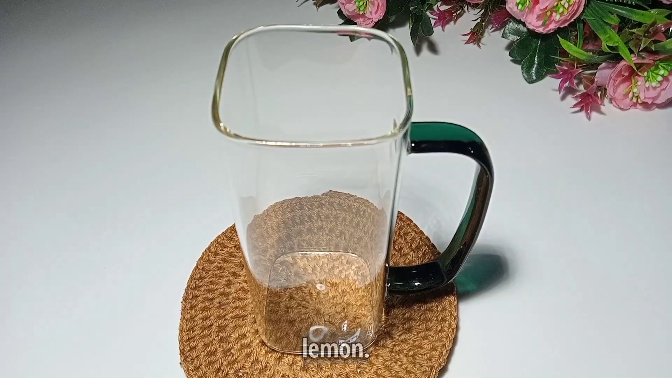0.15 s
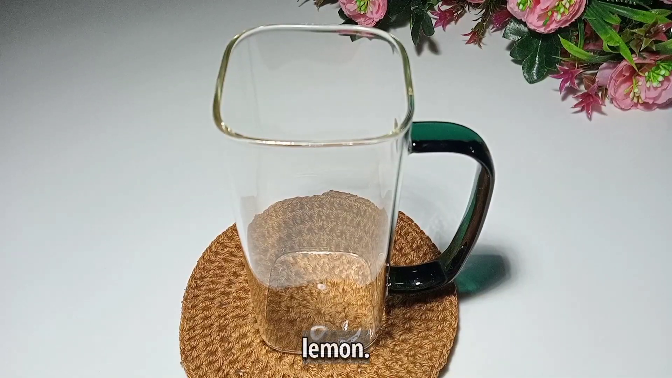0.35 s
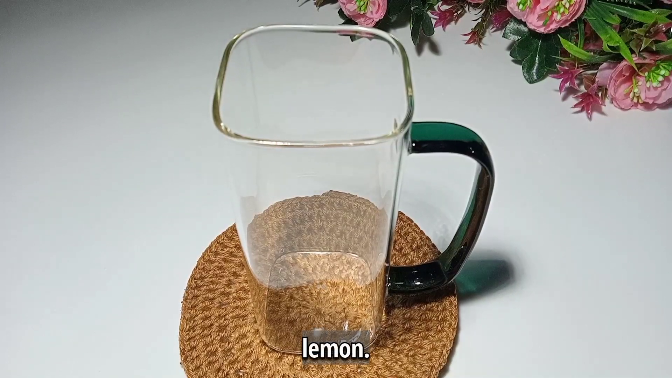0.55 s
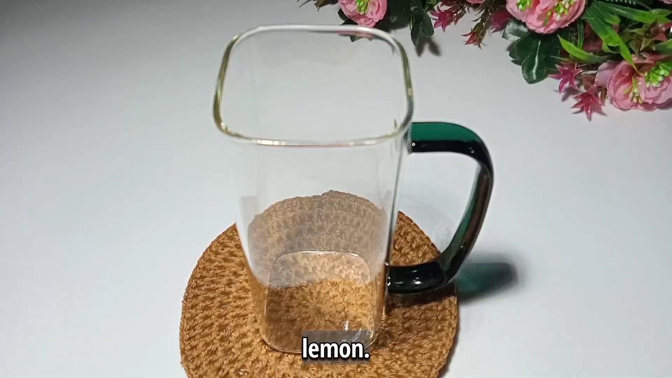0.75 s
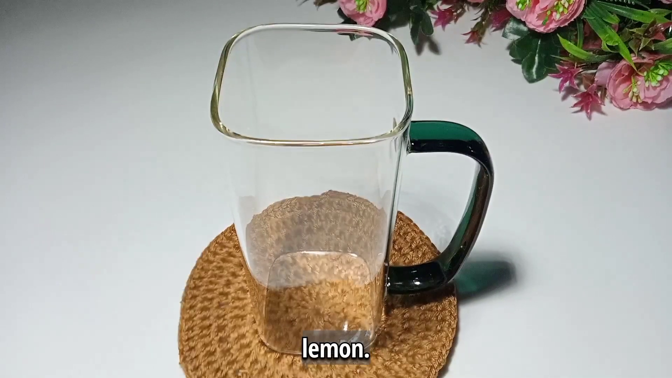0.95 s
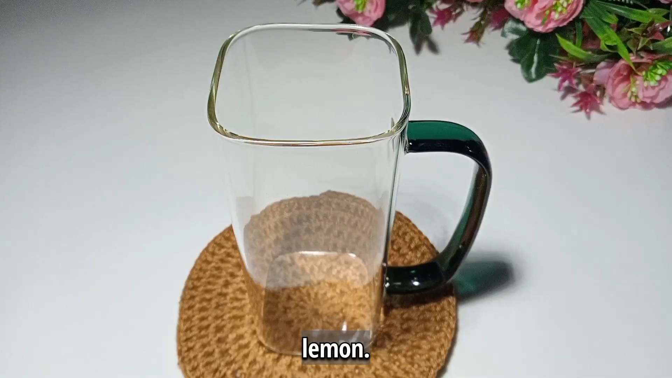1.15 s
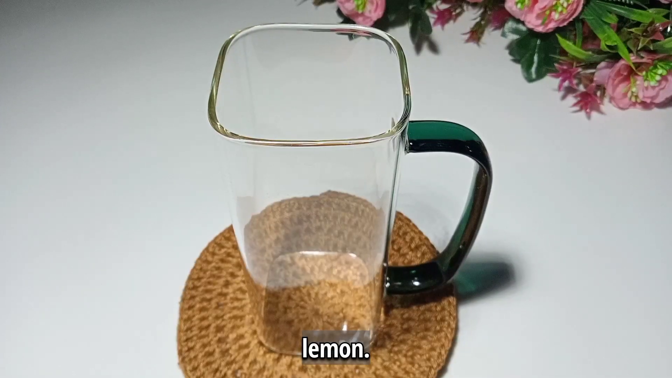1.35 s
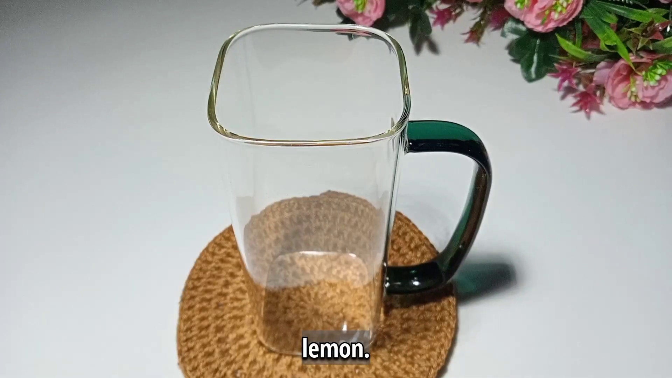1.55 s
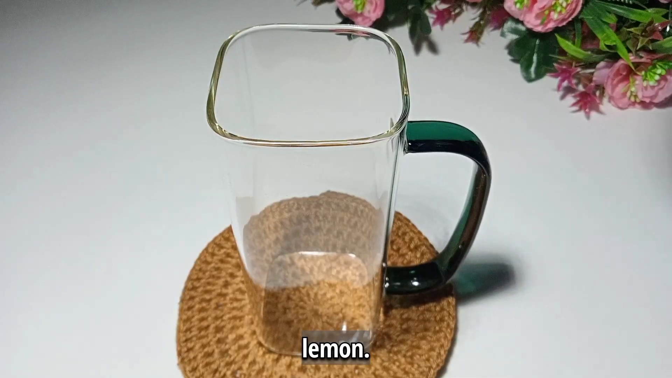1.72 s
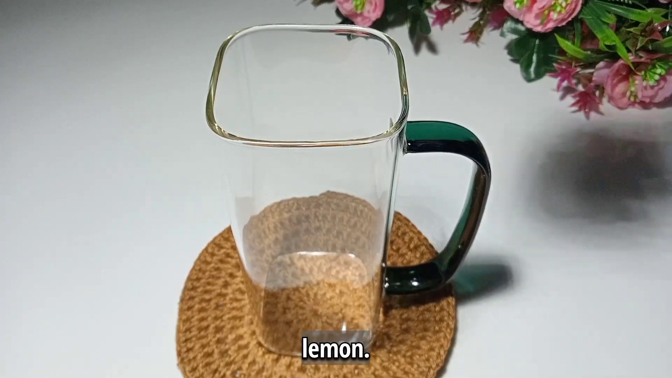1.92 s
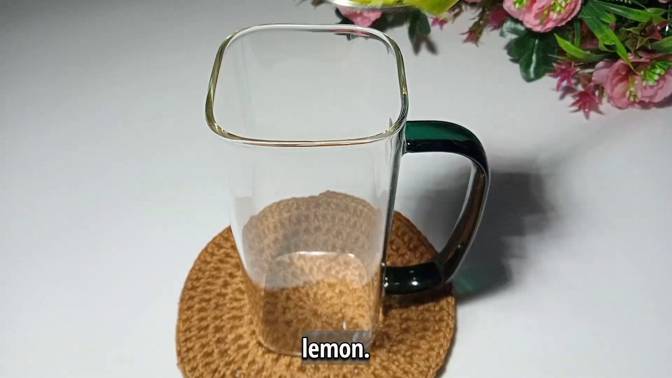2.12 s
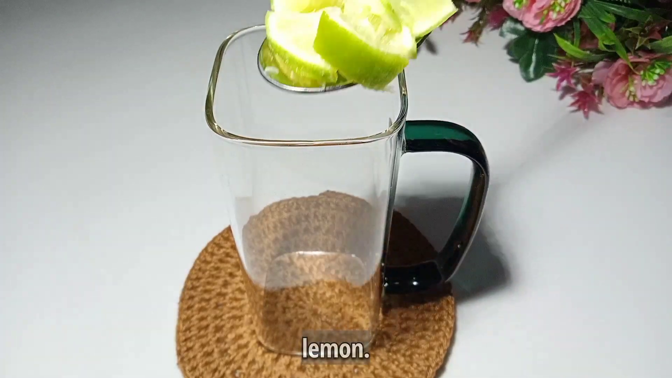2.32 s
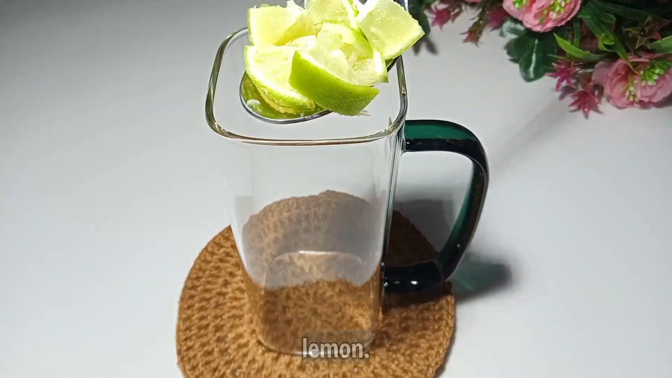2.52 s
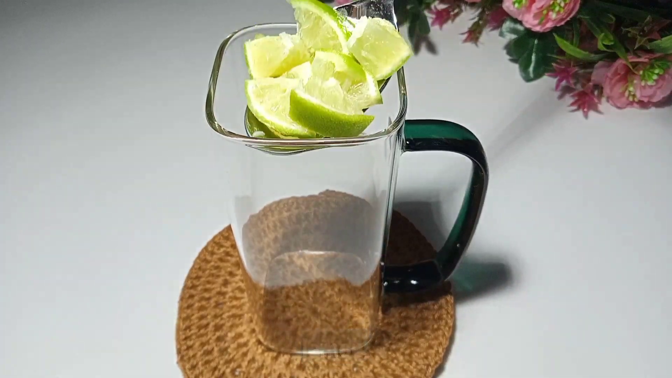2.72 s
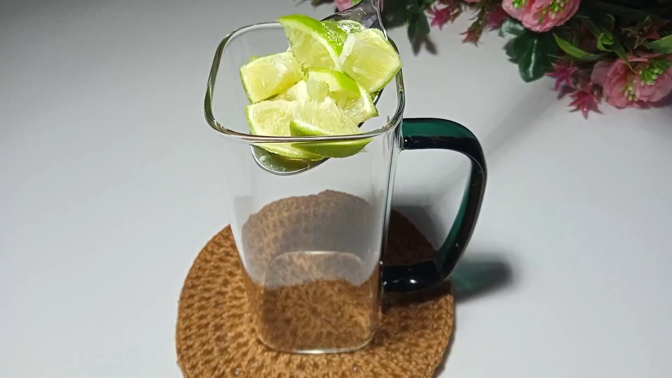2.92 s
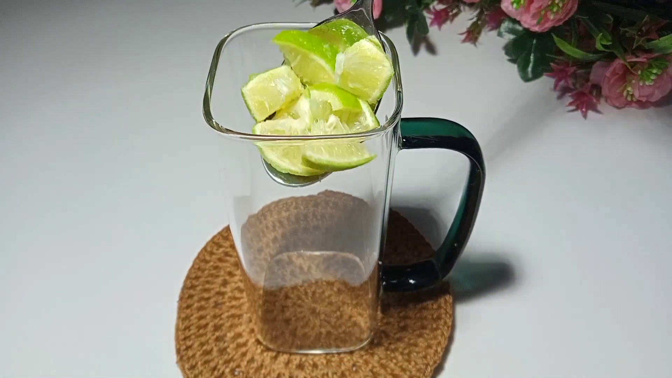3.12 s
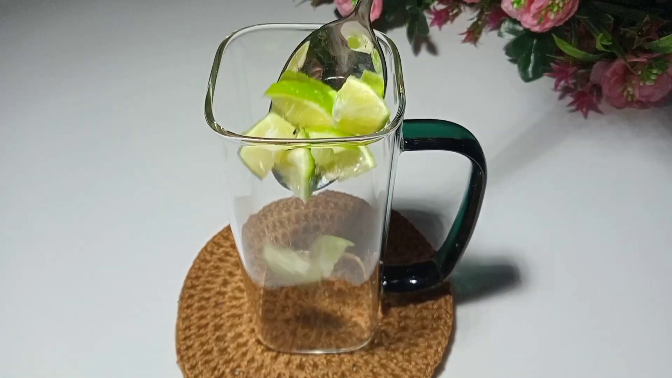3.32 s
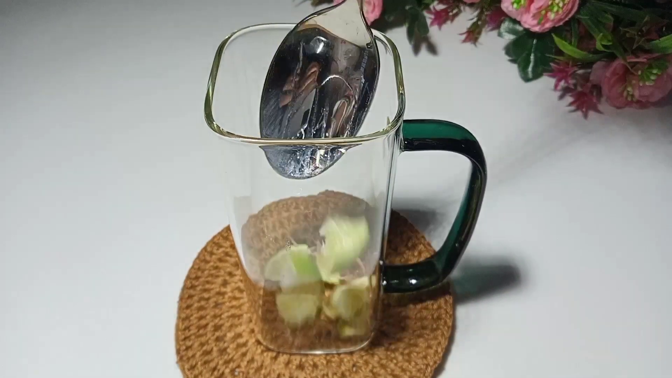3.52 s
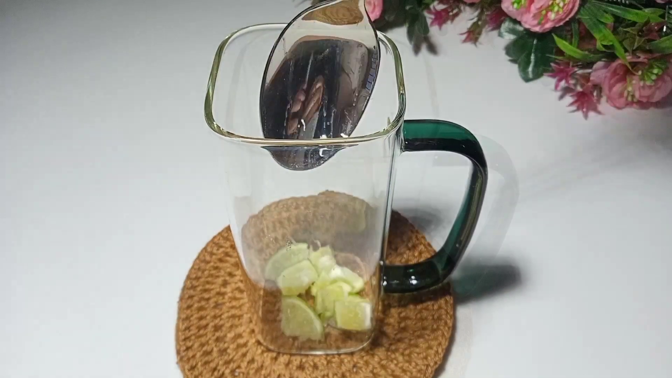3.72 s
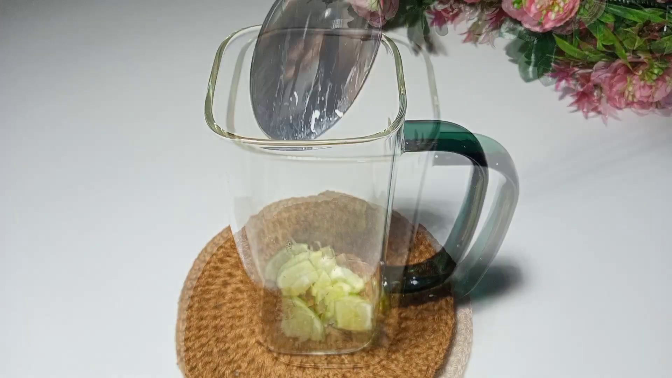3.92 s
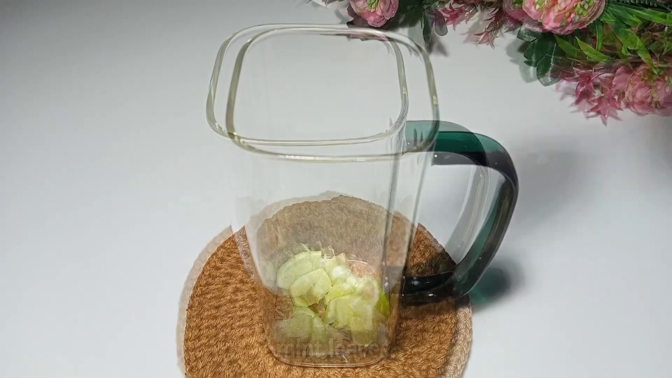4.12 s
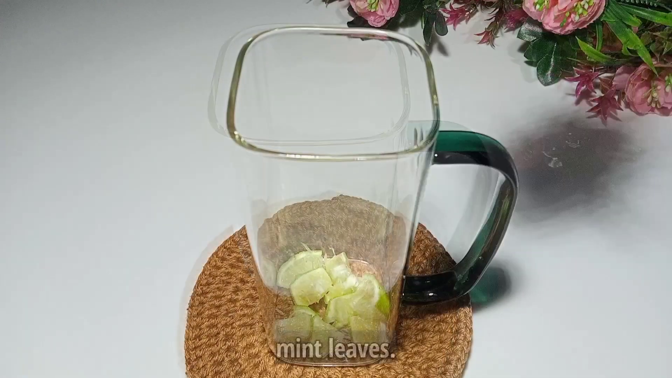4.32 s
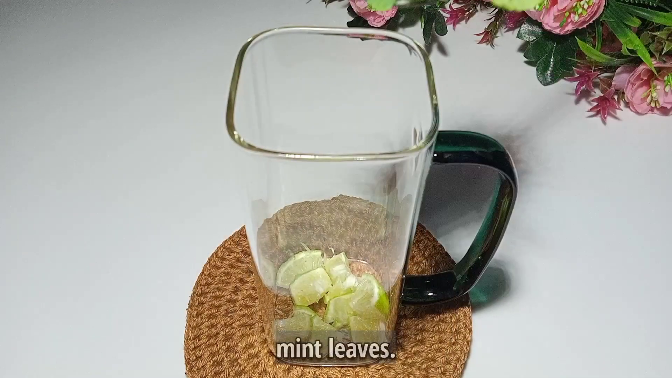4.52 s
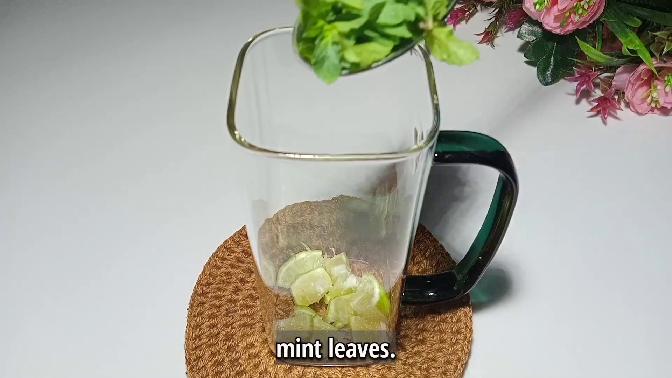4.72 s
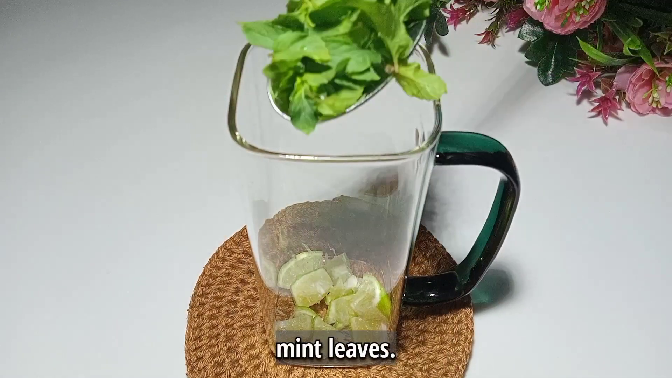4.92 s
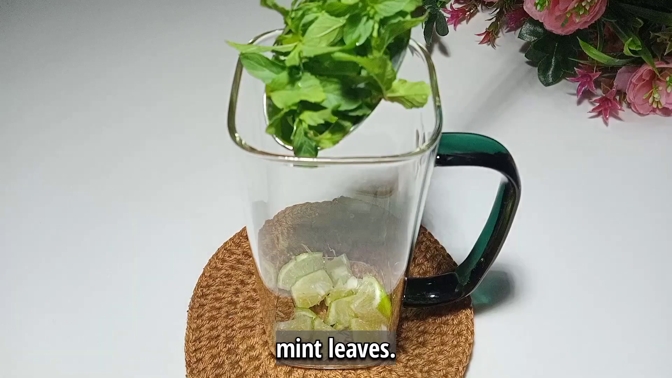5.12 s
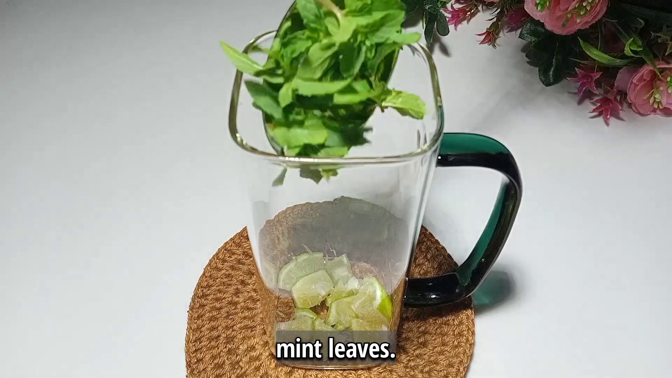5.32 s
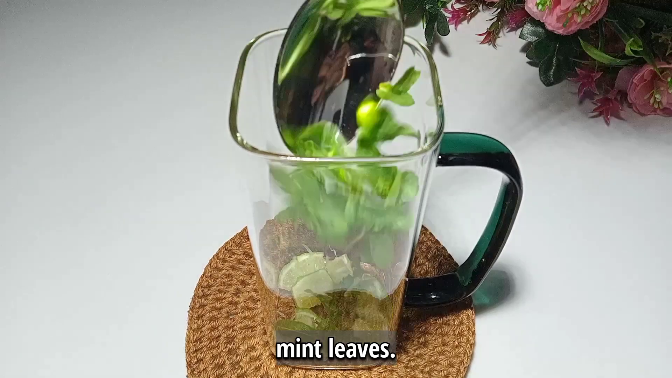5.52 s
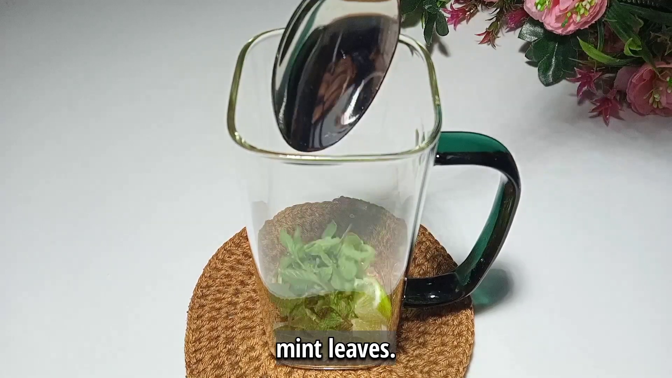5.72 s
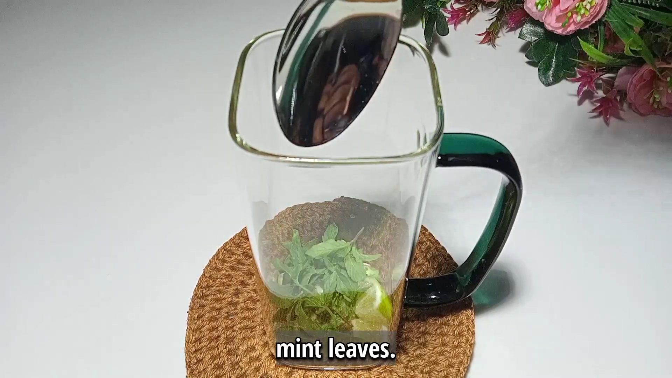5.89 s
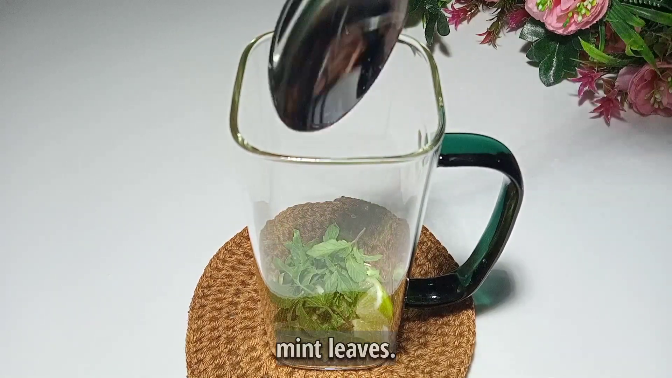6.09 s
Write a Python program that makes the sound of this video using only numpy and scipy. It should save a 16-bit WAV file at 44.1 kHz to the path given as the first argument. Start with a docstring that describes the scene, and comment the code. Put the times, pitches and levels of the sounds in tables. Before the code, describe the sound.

Quiet kitchen: faint rustles, sharp ringing spoon-on-glass clinks, hollow plops of lime pieces, a pause, then a cluster of duller glass taps.

```python
"""A quiet kitchen: lime pieces, then mint leaves, are tipped from a steel spoon into a square glass mug.
Spoon or lime on glass gives modal rings with noisy cracks; the spoon, resting on the rim, damps them.
Falling lime excites the air column and the table; the mint has no landing sound of its own.
Rustles and a light tap are shaped noise, a faint whirr is a fluttering falling tone, and filtered
noise gives hiss and rumble. Decaying noise echoes the mug, spoon and lime sounds."""
import sys
import numpy as np
from scipy import signal
from scipy.fft import rfft, irfft
from scipy.io import wavfile
from scipy.ndimage import uniform_filter1d

SR = 44100
rng = np.random.default_rng(int(sys.argv[2]) if len(sys.argv) > 2 else 0)


def transcribe(u):
    """Save the signal u as a 16-bit wav file named by the first command-line argument.

    u: samples, shape (n,) or (channels, n), limited to [-1, 1]; the rate is SR.
    q: integer samples, one column per channel.
    """
    v = np.clip(np.atleast_2d(u).T, -1, 1)
    q = np.round(v * 32767).astype(np.int16)
    wavfile.write(sys.argv[1], SR, q)


N = 271215
TIME = np.arange(N) / SR

# Noise spectra of the room's hiss and rumble: frequency_hz, relative_level_db (per Hz)
HISS_SPECTRUM = [(170, 4), (240, 3.5), (400, -2), (830, -6.5), (1450, -9), (2900, -12), (3850, -18),
                 (6280, -35), (8030, -33), (10100, -40), (15500, -38.5)]
RUMBLE_SPECTRUM = [(44, -17.5), (50, -8), (65, -2.5), (84, 3.5), (102, -6.5), (120, 3), (150, -10.5),
                   (260, -12), (400, -17.5)]
# Slow heaving of the rumble: time_s, level_db
RUMBLE_LEVEL = [(0.0, -68), (0.29, -66), (0.79, -69), (2.53, -66), (2.72, -63), (3.2, -64), (3.56, -57),
                (4.11, -70), (5.45, -71), (5.81, -65), (6.15, -67)]
HISS_DB = -67  # mean level

# Strokes of handling and sliding food: start_s, level_db, brightness_db_per_octave
RUSTLES = [(.06, -71, 1), (1.056, -59.5, -4), (1.135, -58, -3.5), (1.52, -68.5, -1.5), (1.865, -68, 0),
           (2.524, -51.5, 1.5), (2.551, -47.7, -4), (2.695, -63.5, -3), (2.89, -61, -8), (3.161, -71, 2.5),
           (3.339, -55, -3), (3.677, -57, -6), (3.925, -65.5, -.5)]
# Noise spectra of a stroke and of the light, dull, more distant tap:
# frequency_hz, relative_level_db (per Hz)
RUSTLE_SPECTRUM = [(200, -12.5), (700, -9), (1500, -2.5), (2500, 3), (3800, 0), (5200, -9.5), (7000, -16),
                   (8500, -9.5), (10500, -33.5), (15000, -18.5)]
TAP_SPECTRUM = [(800, -19), (1400, -9), (1800, -0.5), (2400, 4), (3000, 1.5), (3800, -29), (6000, -21)]
# Decay time is for a stroke of mean level; louder strokes die sooner
RUSTLE_RISE_S, RUSTLE_T60_S, RUSTLE_SHORTER_S_PER_DB = .017, .31, .007
TAP_S, TAP_DB, TAP_RISE_S, TAP_T60_S = 1.2765, -51.5, .002, 0.15

WHIRR_S, WHIRR_LENGTH_S, WHIRR_DB = 1.32, .42, -69.5
WHIRR_HZ, WHIRR_SAG_HZ_PER_S = 1240, 560

# Spoon, or a piece of lime, meets glass: start_s, level_db, rim_place (0 mid-face, 1 corner),
# spoon_part (0 bowl, 1 neck), hardness_db_per_octave (treble tilt)
CLINKS = [(2.795, -29, 1, .25, 1), (2.839, -22.7, .02, .15, 3.7), (2.8615, -35.5, .4, .15, 4.5),
          (3.3144, -66.5, .05, .5, -3), (3.332, -51, .12, .3, -.8), (3.452, -63, .15, .3, -1),
          (3.4627, -60.5, .2, 0, 7), (3.476, -54.5, 1, .2, 0), (3.53, -33.5, .15, 1, 5.3),
          (3.64, -52.5, .3, .2, .5), (5.5995, -27, .09, .2, -4.7), (5.6738, -27, .03, .4, -8.5),
          (5.699, -32, .05, .35, -6.5), (5.784, -46.5, .1, 0, -7)]
# The spoon leans on the rim and damps it: start_s, end_s, pressure (relative)
RESTS = [(2.805, 2.99, 2.3), (2.99, 3.47, .4), (5.68, 6.15, 2.5)]
# Vibration modes by family: pitch_hz, level_db, t60_s, loss_db_per_s (extra, per unit of pressure)
OVAL_MODES = [(1254, -8.5, 1.25, 298.5), (1457.4, -8, 1.0, 417.5)]
FACE_MODES = [(2095, -11.5, 0.61, 27), (3183, -8.5, 0.26, 40), (3765, -9.5, 0.24, 80),
              (3862, -8, 0.18, 150), (4330, -4, 0.075, 75)]
CORNER_MODES = [(2226, -10, 0.63, 34), (4255, -16, .12, 60), (5800, -23.5, .09, 50), (9850, -33, 0.088, 60)]
BRIGHT_MODES = [(5450, -16, .17, 100), (5992, -5, .12, 180), (6150, -15, .13, 100), (10630, -18.5, .09, 60)]
SPOON_MODES = [(3700, -12, 0.45, 40), (4021, -5.5, .12, 40), (7510, -17.5, 0.18, 30)]
SHARED_MODES = [(2895, 1, 0.22, 160), (4325, -14, .16, 100), (6880, -25, 0.16, 110),
                (7970, -12.5, 0.11, 120), (8360, -26.5, 0.067, 80), (12250, -25, 0.095, 60),
                (12100, -29.5, .1, 60), (14200, -23.5, .08, 80), (14840, -28.5, .08, 80),
                (14950, -27.5, .08, 80)]
# Soft touches and the stiff neck favour the lowest modes
OVAL_DB, OVAL_AT_NECK_DB, OVAL_PER_HARDNESS_DB = -3.5, 6, -.6
# Face and corner modes struck at their antinode; what is left at their node
FACE_DB, CORNER_DB, NODE_DB = .4, 11.5, -22
BRIGHT_DB, BRIGHT_AT_NECK_DB, BRIGHT_AT_CORNER_DB = -1.5, 8, -6
SPOON_DB, SPOON_AT_NECK_DB = .7, -18
SHARED_DB, SHARED_AT_CORNER_DB = .3, -3

# Dense short ring at a contact: frequency_hz, relative_level_db (per Hz)
CRACK_SPECTRUM = [(150, -16.5), (400, -12), (900, -8.5), (1800, 2), (2700, -4.5), (3450, -4.5), (3850, -6),
                  (4500, 2.5), (5100, -19.5), (6000, -6), (7000, -18), (8300, -8.5), (11500, -27),
                  (15000, -25)]
# Light and hard touches crack more than they ring
CRACK_DB, CRACK_PER_LIGHTER_DB, CRACK_PER_HARDNESS_DB = -3.0, .23, .4
FIRM_DB = -28  # level of an ordinary clink
AIR_T60_S, AIR_DB = 0.12, -13  # the air column, as a clink stirs it

# Lime lands: start_s, level_db
DROPS = [(3.454, -41), (3.4765, -30), (3.53, -47), (3.6135, -33), (3.642, -41), (3.671, -33)]
# Resonances of the table top under the mat: pitch_hz of each
TABLE_HZ = (89, 117)
EMPTY_HZ, FILLED_HZ = 526, 578  # the filling shortens the air column and raises its note
FILL_S = .09  # the bottom is covered this soon after the first piece
THUD_DB = -44.5  # the same for every piece

ROOM_T60_S, ROOM_DB = 0.61, -24
CUTOFF_HZ = 15700


def from_db(db):
    """Logarithmic level: decibels become an amplitude ratio."""
    return 10 ** (np.asarray(db) / 20)


def rms_one(x):
    """Normalisation of power: scale to unit rms."""
    return x / np.sqrt(np.mean(x ** 2) + 1e-20)


def add(out, s, sound):
    """Superposition: mix a sound in from time s."""
    at = int(round(s * SR))
    out[at:at + len(sound)] += sound[:N - at]


def noise(spectrum, size, tilt_db=0, tilt_from_hz=300):
    """Spectral shaping: unit-rms noise, tilted per octave above a pitch and falling beyond both ends."""
    hz, db = np.transpose(spectrum)
    octave = np.log2(np.maximum(np.fft.rfftfreq(size, 1 / SR), 1))
    octaves_beyond = np.abs(octave - np.clip(octave, np.log2(hz[0]), np.log2(hz[-1])))
    shape_db = np.interp(octave, np.log2(hz), db) - 24 * octaves_beyond
    shape_db = shape_db + tilt_db * np.maximum(octave - np.log2(tilt_from_hz), 0)
    white = rng.standard_normal(size)
    return rms_one(irfft(rfft(white) * from_db(shape_db), size))


def decay(t, t60):
    """Exponential damping: the amplitude falls 60 dB in t60 seconds."""
    return np.exp(-np.log(1000) * t / max(t60, 1e-3))


def ring(t, hz, t60, rise_s):
    """Damped oscillation: a decaying sine with an exponential rise over the contact time."""
    return np.sin(2 * np.pi * hz * t) * decay(t, t60) * (1 - np.exp(-t / rise_s))


def background(hiss_follow=0.5):
    """Stationary noise under slow modulation: a heaving rumble, and hiss that follows half its dB swing."""
    rumble_db = np.interp(TIME, *np.transpose(RUMBLE_LEVEL))
    rumble = from_db(rumble_db) * noise(RUMBLE_SPECTRUM, size=N)
    hiss_db = HISS_DB + hiss_follow * (rumble_db - rumble_db.mean())
    hiss = from_db(hiss_db) * noise(HISS_SPECTRUM, size=N)
    return rumble + hiss


def handling(grain_db=1.5):
    """Friction noise: grainy brushing strokes rise and decay; one light tap is a short noise burst."""
    out, t = np.zeros(N), TIME[:SR // 2]
    mean_db = np.mean([db for s, db, tilt in RUSTLES])
    for s, db, tilt in RUSTLES:
        smoothed = uniform_filter1d(rng.standard_normal(len(t)), size=100)
        grain = from_db(grain_db * rms_one(smoothed))
        t60 = RUSTLE_T60_S - RUSTLE_SHORTER_S_PER_DB * (db - mean_db)
        rise = np.minimum(t / RUSTLE_RISE_S, 1)
        envelope = rise * decay(np.maximum(t - RUSTLE_RISE_S, 0), t60)
        brushing = rms_one(grain * noise(RUSTLE_SPECTRUM, size=len(t), tilt_db=tilt))
        add(out, s, from_db(db) * envelope * brushing)
    tap_envelope = np.minimum(t / TAP_RISE_S, 1) * decay(t, TAP_T60_S)
    add(out, TAP_S, from_db(TAP_DB) * tap_envelope * noise(TAP_SPECTRUM, size=len(t)))
    return out


def whirr():
    """Amplitude modulation: noise flutters a faint tone that swells, sinks in pitch and fades."""
    out, t = np.zeros(N), TIME[:int(WHIRR_LENGTH_S * SR)]
    flutter = noise([(10, 0), (110, -2)], size=N)[:len(t)]
    pitch_hz = WHIRR_HZ - WHIRR_SAG_HZ_PER_S * t
    tone = np.sin(2 * np.pi * np.cumsum(pitch_hz) / SR)
    swell = np.sin(np.pi * t / WHIRR_LENGTH_S)
    add(out, WHIRR_S, from_db(WHIRR_DB) * swell * rms_one(flutter * tone))
    return out


def mode_families():
    """Modal excitation: face modes have nodes at the corners, corner modes in mid-face."""
    s, db, place, neck, hardness = np.transpose(CLINKS)
    angle = np.pi / 2 * place
    face_db = 20 * np.log10(np.hypot(np.cos(angle), from_db(NODE_DB)))
    corner_db = 20 * np.log10(np.hypot(np.sin(angle), from_db(NODE_DB)))
    # each family with its level at every clink
    return [(OVAL_MODES, db + OVAL_DB + OVAL_AT_NECK_DB * neck + OVAL_PER_HARDNESS_DB * hardness),
            (FACE_MODES, db + FACE_DB + face_db),
            (CORNER_MODES, db + CORNER_DB + corner_db),
            (BRIGHT_MODES, db + BRIGHT_DB + BRIGHT_AT_NECK_DB * neck + BRIGHT_AT_CORNER_DB * place),
            (SPOON_MODES, db + SPOON_DB + SPOON_AT_NECK_DB * neck),
            (SHARED_MODES, db + SHARED_DB + SHARED_AT_CORNER_DB * place)]


def glass(scatter_db=2.8, rise_s=0.0036):
    """Modal resonance: clinks top up the modes of mug and spoon; the resting spoon adds damping."""
    starts = [int(round(row[0] * SR)) for row in CLINKS] + [N]
    pressure_now = sum(pressure * ((TIME >= begin) & (TIME < end)) for begin, end, pressure in RESTS)
    pressed = np.cumsum(pressure_now) / SR  # pressure accumulated over time
    out = np.zeros(N)
    for modes, levels_db in mode_families():
        for hz, mode_db, t60, loss in modes:
            swing = 0j  # amplitude and phase still ringing
            chance = rng.standard_normal((len(CLINKS), 2))
            for k, (s, *_, hardness) in enumerate(CLINKS):
                treble_db = hardness * max(np.log2(hz / 3500), 0)
                blow = from_db(levels_db[k] + mode_db + treble_db + scatter_db * chance[k, 0])
                # each blow adds its energy to what still rings, and a strong one upsets the phase
                height = np.hypot(abs(swing), blow)
                turn = np.angle(swing) + chance[k, 1] * blow / height
                # up to the next clink, at most one second
                t = TIME[:min(starts[k + 1] - starts[k], SR)]
                pressed_since = pressed[starts[k]:][:len(t)] - pressed[starts[k]]
                fade = decay(t, t60) * from_db(-loss * pressed_since)
                # the old swing passes into the new one over the contact time
                onset = np.exp(-t / rise_s)
                amplitude = swing * onset + height * np.exp(1j * turn) * (1 - onset)
                wave = amplitude * fade * np.exp(2j * np.pi * hz * t)
                add(out, s, wave.imag)
                swing = wave[-1] * np.exp(2j * np.pi * hz / SR)
    return out


def air_hz(s):
    """Air-column resonance: its note at time s rises as the filling shortens the column."""
    first_s = DROPS[0][0]
    return np.interp(s, [first_s, first_s + FILL_S], [EMPTY_HZ, FILLED_HZ])


def contacts(crack_t60=0.067, tail_t60=0.14, tail_db=-6, rise_s=.0006, brightening=.9,
             uneven_db=0.5, count=110):
    """Impact excitation: a touch cracks, sets many small high modes ringing and stirs the air column."""
    out, t = np.zeros(N), TIME[:SR // 3]
    hz = np.linspace(3600, 15600, count) + rng.normal(0, 40, count)
    mode_db = np.interp(hz, *np.transpose(CRACK_SPECTRUM)) + uneven_db * rng.standard_normal(count)
    sines = np.sin(2 * np.pi * (hz[:, None] * t + rng.random((count, 1))))
    for s, db, *_, hardness in CLINKS:
        tilt_db = brightening * hardness
        burst = noise(CRACK_SPECTRUM, size=len(t), tilt_db=tilt_db, tilt_from_hz=3600)
        crack = burst * decay(t, crack_t60)
        heights = from_db(mode_db + tilt_db * np.log2(hz / hz[0])) * rng.standard_normal(count)
        shimmer = from_db(tail_db) * rms_one(heights @ sines) * decay(t, tail_t60)
        crack_db = db + CRACK_DB + CRACK_PER_LIGHTER_DB * (FIRM_DB - db) + CRACK_PER_HARDNESS_DB * hardness
        rise = 1 - np.exp(-t / rise_s)
        add(out, s - rise_s / 2, from_db(crack_db) * rise * (crack + shimmer))
        add(out, s, from_db(db + AIR_DB) * ring(t, air_hz(s), AIR_T60_S, rise_s=.002))
    return out


def lime(air_t60=0.095, thud_t60=0.38, splat_db=-19, splat_t60=0.11):
    """Soft impact: the air column pops, the table thuds, the wet flesh splats."""
    out, t = np.zeros(N), TIME[:SR // 2]
    for s, db in DROPS:
        pop = ring(t, air_hz(s), air_t60, rise_s=0.003)
        wet = noise([(300, -12), (750, 13), (1200, -0.5), (12000, -22)], size=len(t))
        splat = wet * decay(t, splat_t60)
        add(out, s, from_db(db) * (pop + from_db(splat_db) * splat))
        thud = np.mean([ring(t, hz, thud_t60, rise_s=0.0022) for hz in TABLE_HZ], axis=0)
        add(out, s, from_db(THUD_DB) * thud)
    return out


def kitchen(x, side_db=-10, side_hz=5000, treble_t60=.15):
    """Diffuse reverberation: the echo's treble dies first, and only treble differs between the ears."""
    t = TIME[:SR // 2]
    dull = noise([(100, 13.5), (3000, -3), (6000, -11.5)], size=len(t)) * decay(t, ROOM_T60_S)
    bright = noise([(4000, -2.5), (15000, -4)], size=len(t)) * decay(t, treble_t60)
    tail = dull + bright
    early = rng.standard_normal(len(t)) * decay(t, t60=0.018)
    mid = signal.fftconvolve(x, tail / np.linalg.norm(tail))[:N]
    side = signal.fftconvolve(x, early / np.linalg.norm(early))[:N]
    side = signal.sosfilt(signal.butter(6, side_hz, "high", fs=SR, output="sos"), side)
    opposite_ears = np.array([[1], [-1]])
    return x + from_db(ROOM_DB) * mid + from_db(side_db) * side * opposite_ears


def scene():
    """Superposition of sources: mug, spoon and lime sounds echo; the other layers are centred and dry."""
    mug_spoon_and_lime = glass() + contacts() + lime()
    return kitchen(mug_spoon_and_lime) + handling() + whirr() + background()


def record(dry):
    """Band limiting: a steep elliptic low-pass cuts the top."""
    return signal.sosfilt(signal.ellip(10, .1, 80, CUTOFF_HZ, fs=SR, output="sos"), dry)


dry = scene()
out = record(dry)
transcribe(out)
```